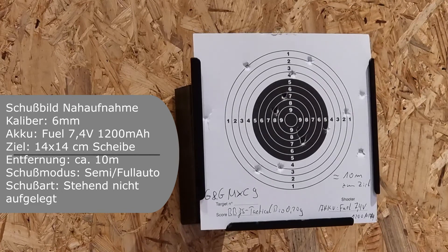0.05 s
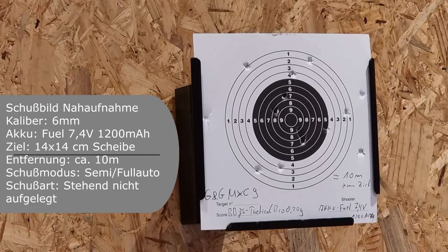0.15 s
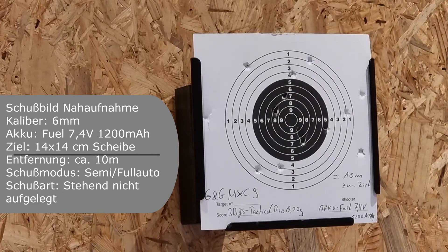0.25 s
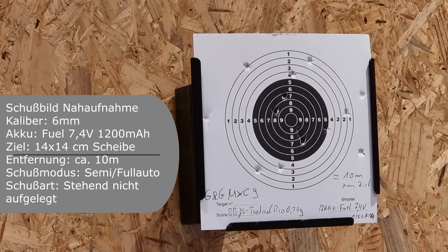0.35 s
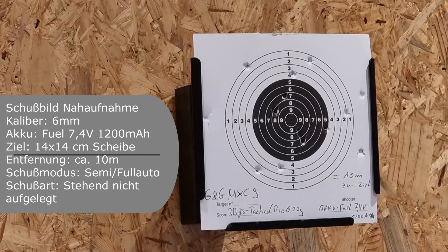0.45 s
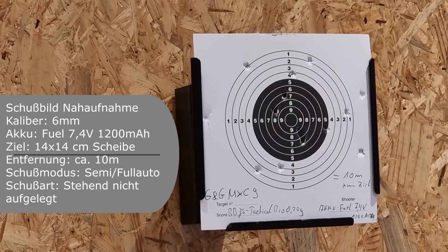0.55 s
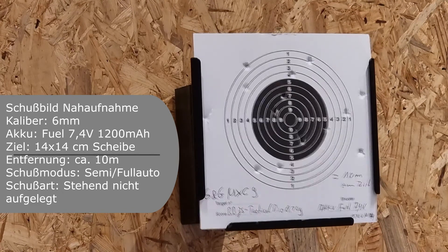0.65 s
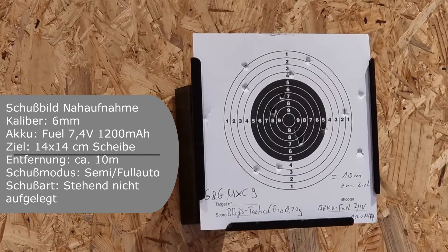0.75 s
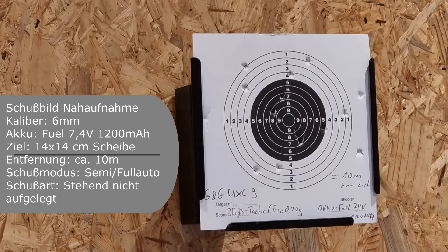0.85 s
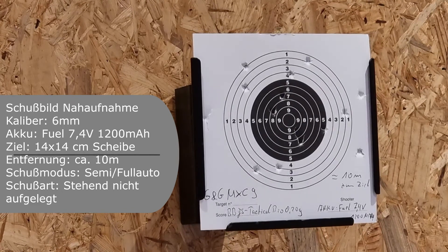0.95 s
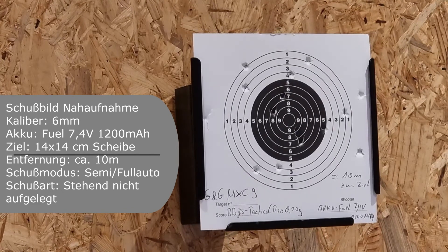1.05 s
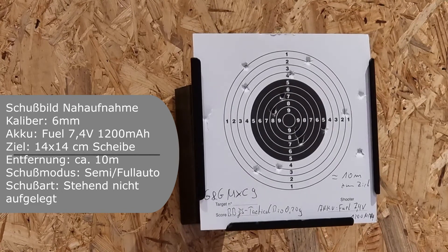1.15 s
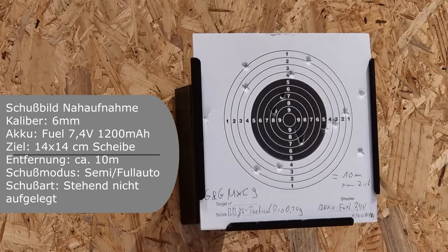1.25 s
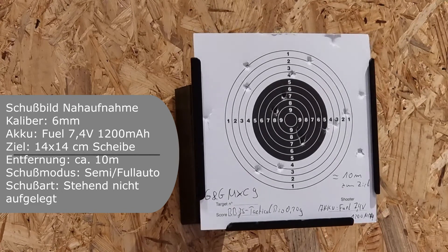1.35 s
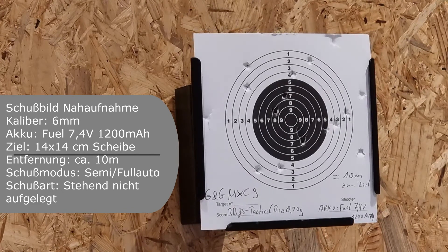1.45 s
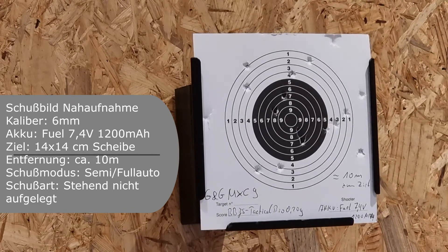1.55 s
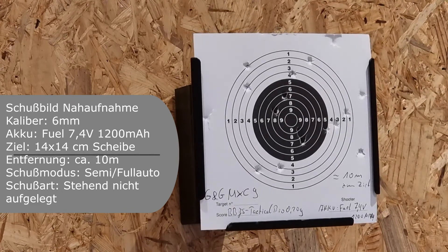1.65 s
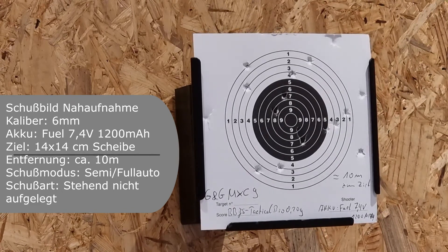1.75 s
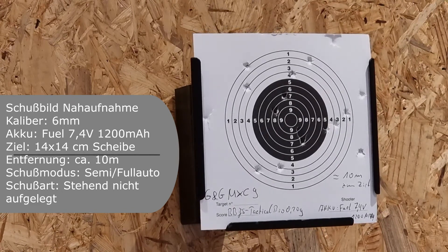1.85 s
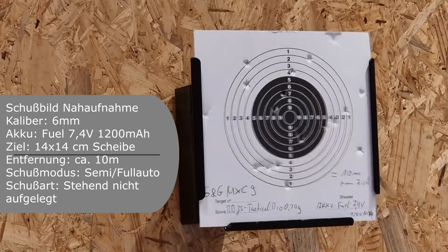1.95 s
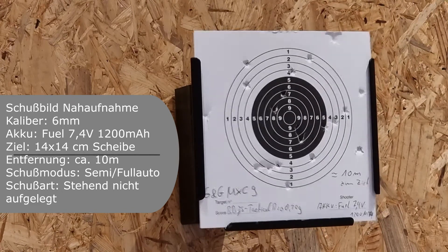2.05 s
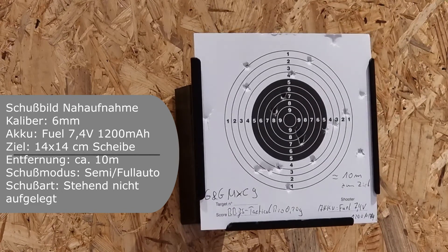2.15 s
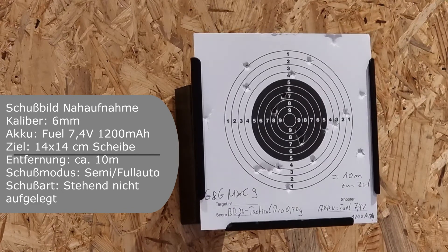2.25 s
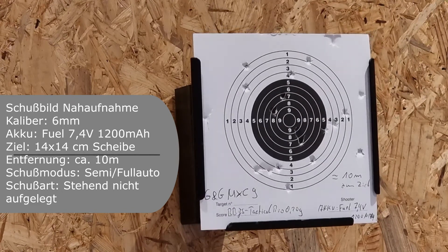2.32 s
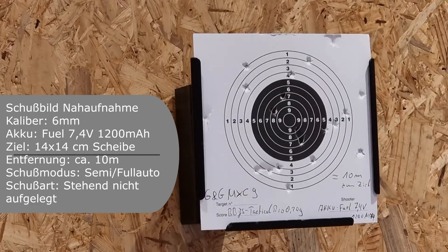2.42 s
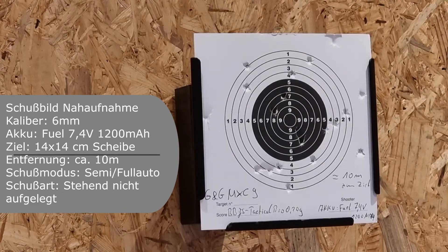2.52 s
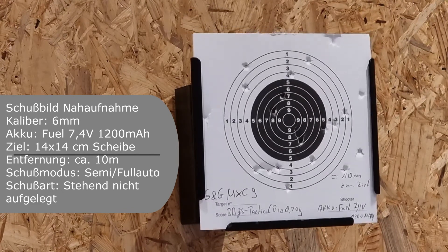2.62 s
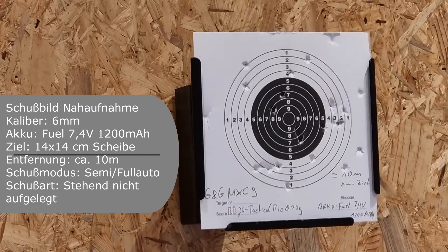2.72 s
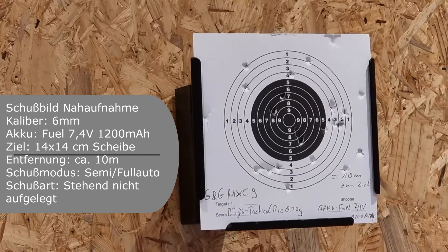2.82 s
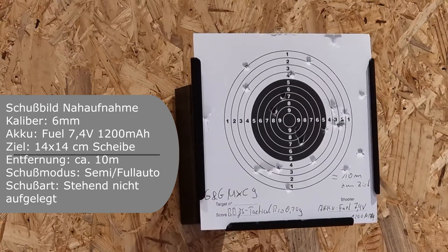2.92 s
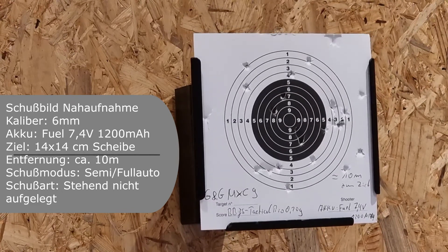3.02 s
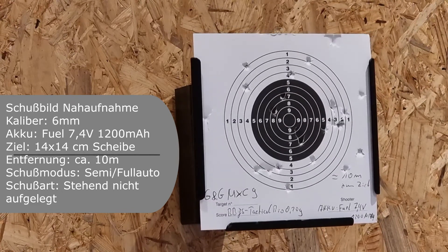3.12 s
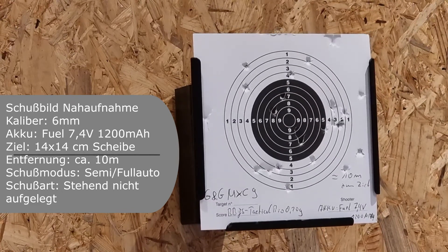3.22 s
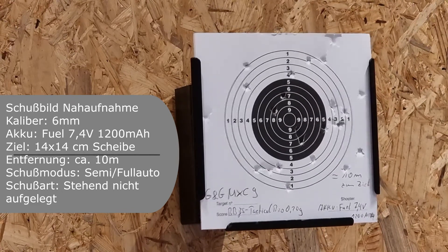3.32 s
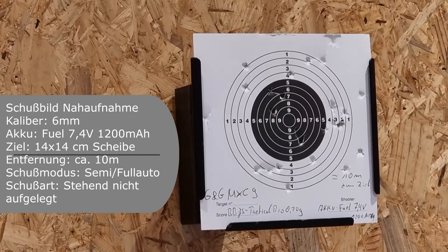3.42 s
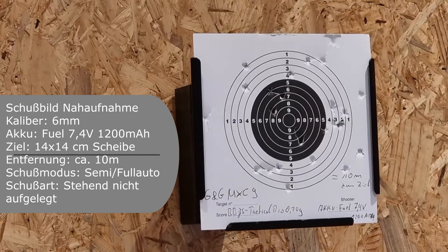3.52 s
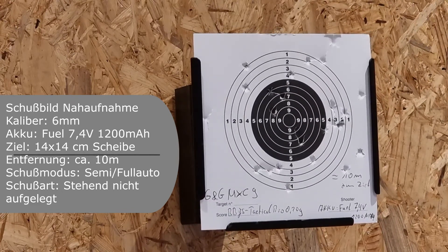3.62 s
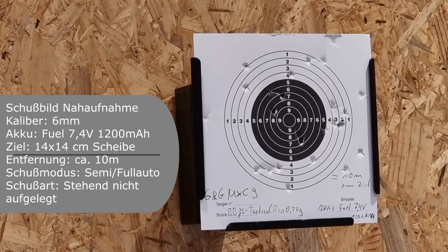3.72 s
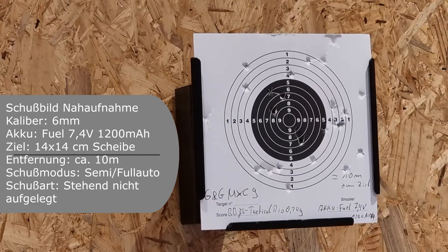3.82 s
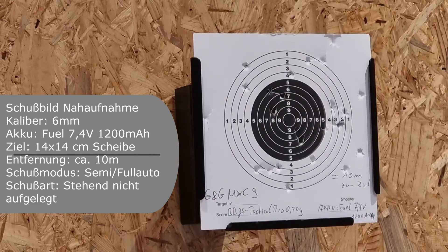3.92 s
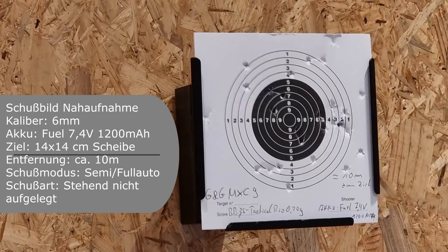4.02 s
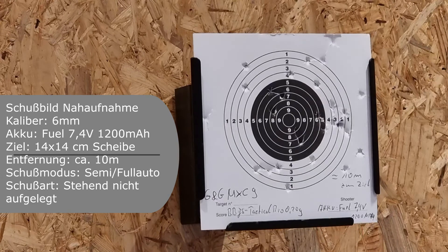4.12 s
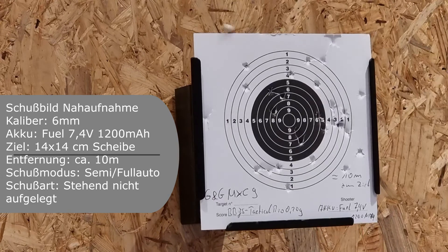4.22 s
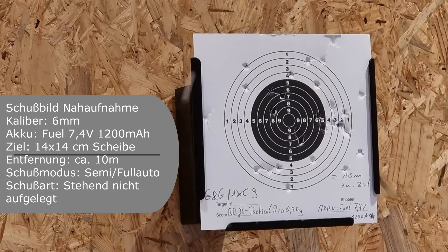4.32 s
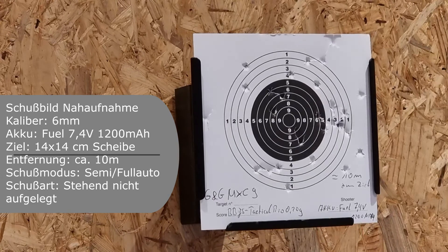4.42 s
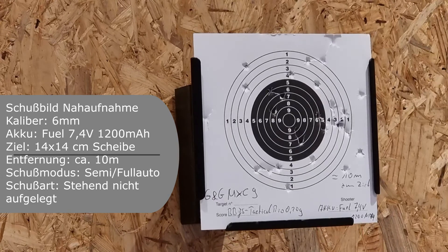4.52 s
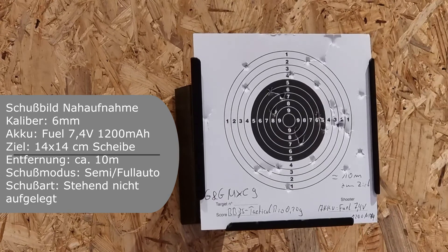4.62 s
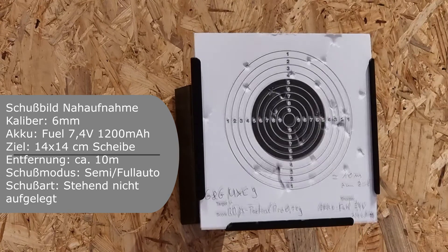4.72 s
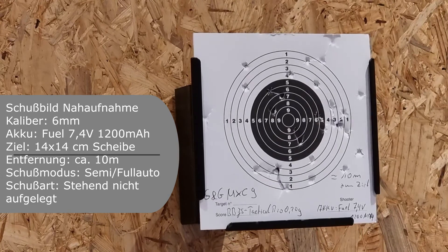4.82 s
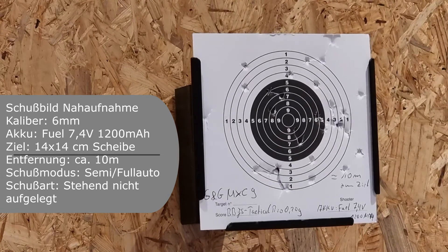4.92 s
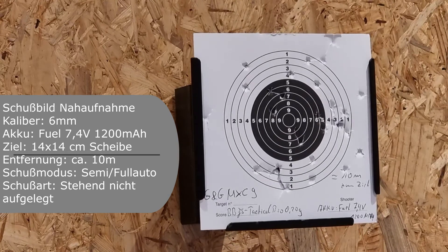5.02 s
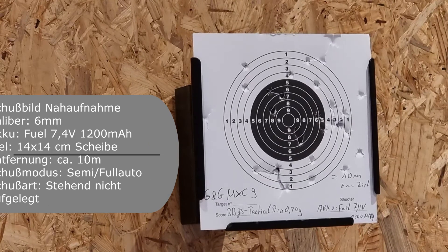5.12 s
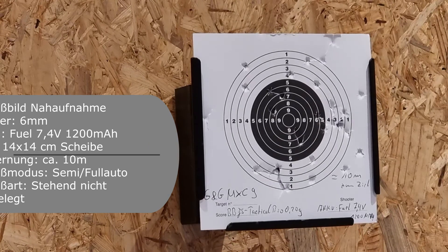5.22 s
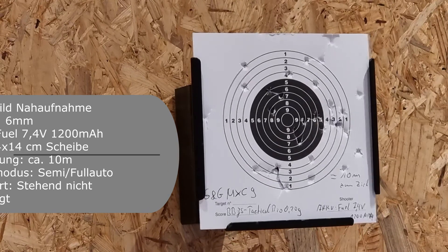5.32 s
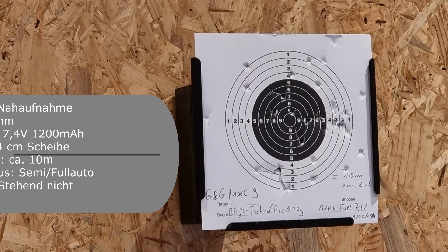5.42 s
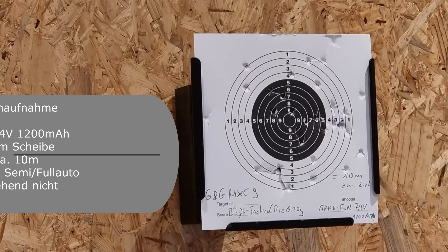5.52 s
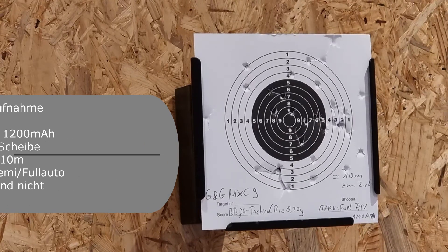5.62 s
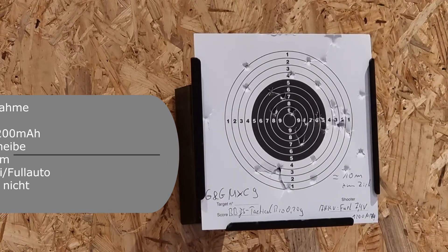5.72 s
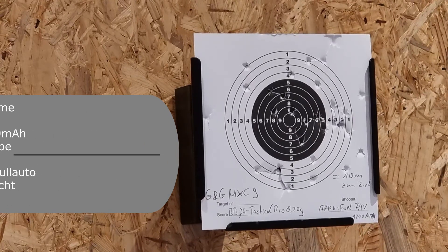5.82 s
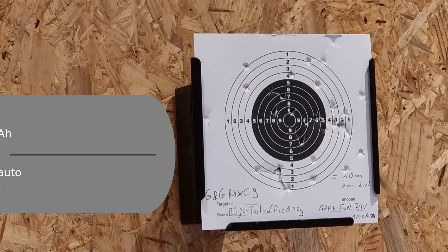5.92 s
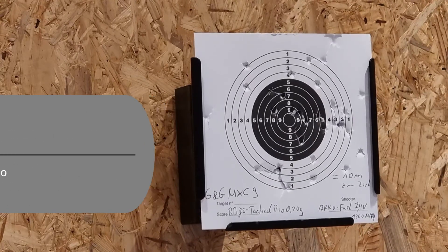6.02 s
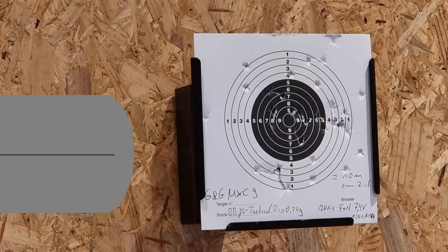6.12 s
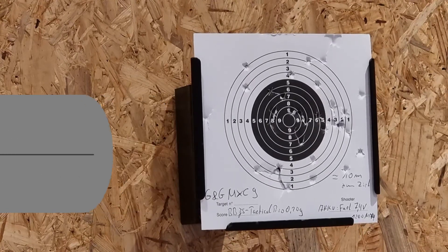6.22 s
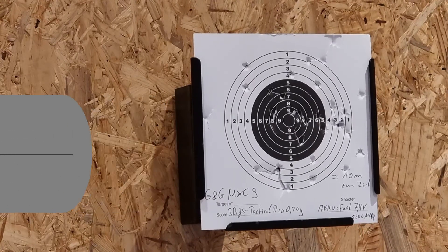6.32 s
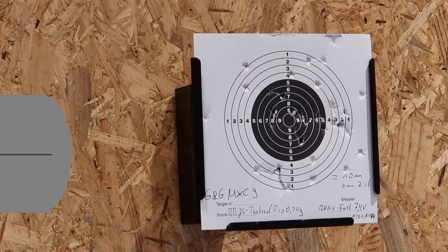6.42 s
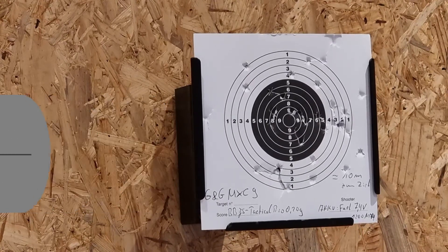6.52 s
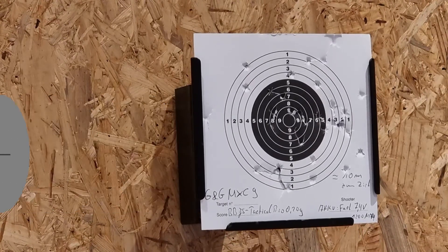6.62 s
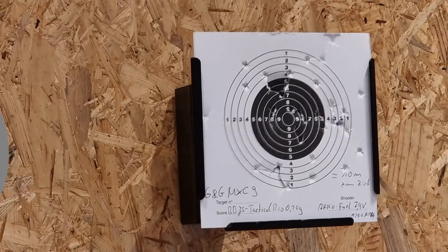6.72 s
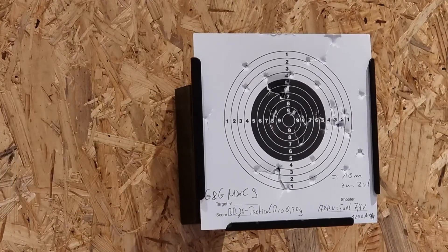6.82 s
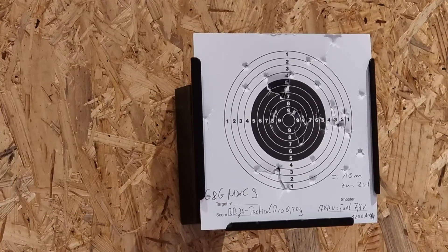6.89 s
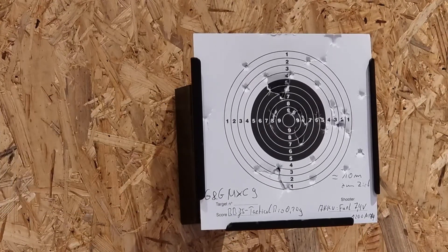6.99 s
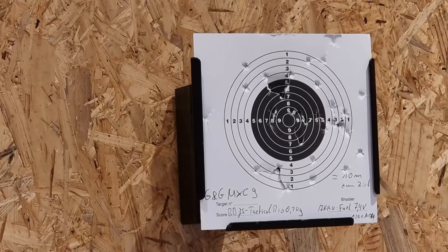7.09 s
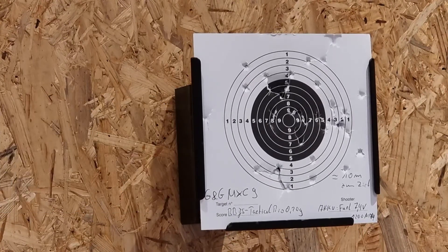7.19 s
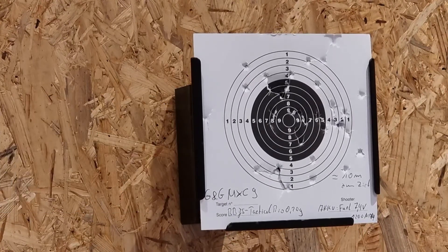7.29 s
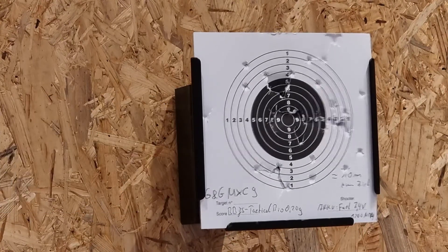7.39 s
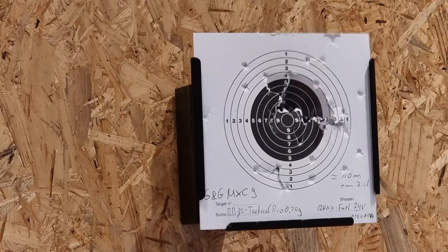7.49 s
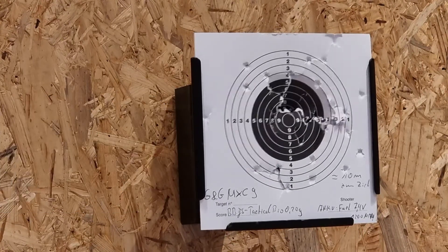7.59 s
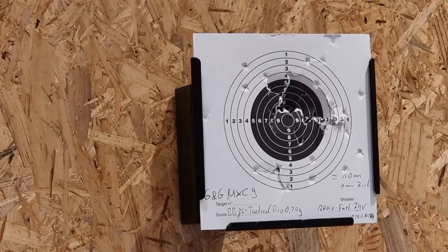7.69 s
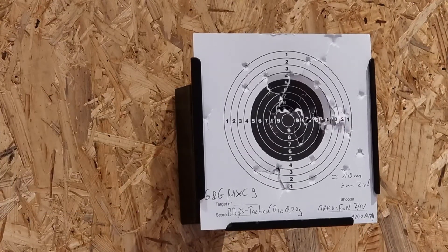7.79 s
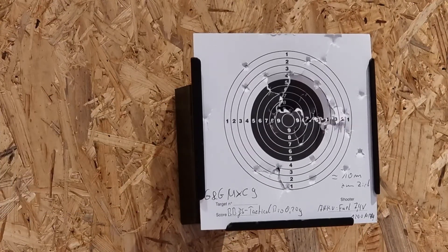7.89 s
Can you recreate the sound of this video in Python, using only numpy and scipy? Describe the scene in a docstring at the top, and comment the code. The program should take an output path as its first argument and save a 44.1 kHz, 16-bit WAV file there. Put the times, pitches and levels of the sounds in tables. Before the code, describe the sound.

Twelve brief bursts of pellets arrive at a steady pace. A dull distant report and gear whirr come just before each, then fast, loud, bright clanks on steel, close to the microphone, with tearing paper hiss. High pings from the rim, a thin lingering ring and scattered ticks fill the gaps. Indoor reverberation is short, with faint room hush and no speech.

```python
"""An airsoft gun at the far end of a room fires twelve short bursts at a paper target on a steel pellet trap.
Each burst starts as a distant whirr and dull reports: noise, partly passed through gearbox resonances.
Pellets then hiss in, crack the back plate (decaying sines), spray through paper and trap (noise), ring the steel.
Spent pellets ping on the rim, tick and rattle (modes, short noise); a limiter holds the hits down."""
import sys
import numpy as np
from scipy import signal
from scipy.io import wavfile
from scipy.ndimage import uniform_filter1d

SR = 44100
rng = np.random.default_rng(int(sys.argv[2]) if len(sys.argv) > 2 else 0)


def store_wav(level_fs):
    """Save 16-bit WAV to argv[1]."""
    pcm = np.round(np.clip(np.atleast_2d(level_fs), -1, 1) * 32767)
    wavfile.write(sys.argv[1], SR, pcm.T.astype(np.int16))


N = 350595
LEAD = SR // 2  # samples kept ahead of time zero for sounds that start before it
AGE_S = np.arange(SR) / SR


def gain_of(db):
    """Decibels to amplitude."""
    return 10 ** (np.asarray(db) / 20)


def decay(t_s, t60_s):
    """Exponential decay, 60 dB down after t60_s."""
    return np.exp(-np.log(1000) * t_s / t60_s)


def swell(rise_s):
    """Reflections build a sound up over rise_s."""
    return 1 - np.exp(-AGE_S / rise_s)


def read(points, hz):
    """A table of (Hz, value), joined on a log-frequency axis."""
    table_hz, value = np.transpose(points)
    return np.interp(np.log(hz + 1), np.log(table_hz + 1), value)


def high_pass(x, hz, order=1):
    """Takes away the bass under hz."""
    return signal.sosfilt(signal.butter(order, hz, "high", fs=SR, output="sos"), x)


def smooth(x, time_s):
    """One-pole average over time_s."""
    keep = np.exp(-1 / (time_s * SR))
    return signal.lfilter([1 - keep], [1, -keep], x)


def empty_mix():
    """Stereo silence that begins LEAD samples early."""
    return np.zeros((2, LEAD + N))


def add(mix, start_s, sound):
    """Lays a stereo sound into a mix that begins LEAD samples early."""
    part = mix[:, max(LEAD + round(start_s * SR), 0):][:, :sound.shape[1]]
    part += sound[:, :part.shape[1]]


# Left-right likeness of the sound field. Each row: frequency in Hz, correlation from -1 to 1.
LIKENESS = [(40, 0.23), (130, 0.87), (300, 0.68), (700, 0.34), (1400, -0.16), (2800, 0.27), (5000, -0.021),
            (16000, -0.18)]
# Stereo balance. Each row: frequency in Hz, left minus right in dB.
BALANCE_DB = [(50, 9), (170, -0.5), (400, -1), (2800, 0.8), (6000, -0.4), (10000, 0.2), (14000, -2)]


def noise(spectrum, t60=None, bright_db=0, ripple_db=0, size=SR):
    """Stereo noise, rms near 1 at the start before bright_db; resonances ripple its colour and decay."""
    hz = np.fft.rfftfreq(512, 1 / SR)
    t_s = np.arange(size // 128 + 5) * 128 / SR
    a, b, c, d = rng.standard_normal((4, len(hz), len(t_s)), dtype=np.float32)
    same = np.clip(read(LIKENESS, hz), -1, 1)[:, None]
    lean = gain_of(read(BALANCE_DB, hz) / 2)[:, None]
    shared, apart = a + 1j * b, c + 1j * d
    bins = np.array([shared * lean, (same * shared + np.sqrt(1 - same ** 2) * apart) / lean])
    ripple = ripple_db * uniform_filter1d(rng.standard_normal(len(hz)), 2) * np.sqrt(2)
    colour = gain_of(read(spectrum, hz) + ripple)
    colour /= np.sqrt(np.sum(colour ** 2))
    # bright_db acts in full above 12 kHz, 0.45 of it below 5.5 kHz
    colour *= gain_of(bright_db * read([(5500, 0.45), (12000, 1.0)], hz))
    bins *= colour[:, None]
    if t60 is not None:
        # strong resonances last longer
        bin_t60_s = read(t60, hz) * gain_of(0.56 * np.minimum(ripple, 2))
        bins *= decay(t_s, bin_t60_s[:, None])
    return np.sqrt(3) * signal.istft(bins, nperseg=512, noverlap=384)[1][:, :size]


def ring(modes, rise_s, scatter_db, detune):
    """Decaying modes; weights vary per blow, and the two microphones meet them in other phases."""
    out = np.zeros((2, SR))
    for hz, db, t60_s in modes:
        weight, drift, apart = rng.standard_normal(3)
        phase = 2 * np.pi * rng.random() + np.array([[0], [apart * (1.5 - read(LIKENESS, hz))]])
        t_s = AGE_S[AGE_S < 2 * t60_s]
        level = gain_of(db + scatter_db * weight) * decay(t_s, t60_s)
        out[:, :len(t_s)] += level * np.sin(2 * np.pi * hz * (1 + detune * drift) * t_s + phase)
    fade_out = np.minimum(4 * (1 - AGE_S), 1)
    return out * swell(rise_s) * fade_out


def clatter(depth_db, grain_s):
    """A random level curve that makes a sound lumpy, one knot every grain_s."""
    knots_s = np.arange(0, 1 + grain_s, grain_s)
    return gain_of(depth_db * np.interp(AGE_S, knots_s, rng.standard_normal(len(knots_s))))


# Spectrum of the quiet room. Each row: frequency in Hz, relative density in dB per Hz.
HUSH_SPECTRUM = [(25, -14), (80, -3), (250, -13), (700, -6.5), (2800, 3), (6000, -2.5), (16000, -13)]


def hush(level_db):
    """The quiet of the room: steady coloured noise."""
    return gain_of(level_db) * noise(HUSH_SPECTRUM, size=N)


# The gun's bursts. Each row: arrival of the first pellet in seconds, number of shots.
BURST_ROWS = [(0.048, 2), (0.727, 2), (1.348, 2), (2.026, 3), (2.7064, 3), (3.4079, 2), (4.073, 3),
              (4.7997, 2), (5.454, 2), (6.1826, 2), (6.8144, 3), (7.5371, 3)]
CYCLE_S = 0.068  # shot to shot
FLIGHT_S = 0.1705  # sound of the gun to the pellet's arrival
# Spectrum of the report. Each row: frequency in Hz, relative density in dB per Hz.
REPORT_SPECTRUM = [(40, -31), (100, -26), (135, -6), (200, -8), (500, -2), (850, -7.5), (1100, 7.5),
                   (2000, 5), (2800, 1.5), (4800, 0), (6000, -19.5), (9000, -10.5), (11500, -9.5),
                   (14000, -2)]
# Spectrum of the whirr's hiss. Each row: frequency in Hz, relative density in dB per Hz.
WHIRR_SPECTRUM = [(100, -47), (800, -10), (1050, -9), (1300, 4), (1460, 13), (1700, -21), (2600, -10),
                  (4800, -7), (6500, -13.5), (16000, -37)]
# Decay of noise in the room. Each row: frequency in Hz, nominal t60 in seconds.
ROOM_DECAY = [(100, 0.93), (700, 0.48), (2500, 0.51), (6000, 0.46), (16000, 0.29)]
# Resonances of gearbox, gun body and room. Each row: frequency in Hz, relative level in dB, t60 in seconds.
GEARBOX_MODES = [(133, -20.5, 0.38), (493, -17, 0.17), (617, -12, .2), (1004, 0, 0.11), (1247, -8, 0.088),
                 (1345, -2, 0.17), (1393, -1, 0.13), (1470, 3, 0.24), (1540, -11, 0.096), (1770, -2, 0.14),
                 (2794, -0.5, 0.087), (4690, 2, 0.051)]


def gun(report_db, whirr_db, gears_db, run_s, coast_s, throb_hz, throb_depth):
    """Far off, mostly room sound: the piston's report, then gears grinding up the next shot as noise in modes."""
    out, teeth = empty_mix(), empty_mix()
    coast = np.exp(-np.maximum(AGE_S - run_s, 0) / coast_s)
    throb = 1 + throb_depth * np.sin(2 * np.pi * throb_hz * AGE_S)
    running = swell(0.0042) * coast * throb
    for first_s, shots in BURST_ROWS:
        for k in range(round(shots)):
            shot_s = first_s - FLIGHT_S + k * CYCLE_S
            bright_db = 2 if k else 0  # brighter after the first shot
            report = noise(REPORT_SPECTRUM, ROOM_DECAY, bright_db, ripple_db=5.0) * swell(0.0017)
            hiss = noise(WHIRR_SPECTRUM, ripple_db=2) * running * clatter(depth_db=0.5, grain_s=0.0025)
            add(out, shot_s, gain_of(report_db) * report + gain_of(whirr_db) * hiss)
            add(teeth, shot_s, running * rng.standard_normal((2, SR)))
    body = ring(GEARBOX_MODES, rise_s=0.00057, scatter_db=2, detune=0)
    body /= np.linalg.norm(body[0])
    gears = signal.oaconvolve(teeth, body, axes=1)[:, :LEAD + N]
    return out + gain_of(gears_db) * gears


def burst_ends():
    """Nominal arrival of the last pellet of each burst, in seconds."""
    return [first_s + (round(shots) - 1) * CYCLE_S for first_s, shots in BURST_ROWS]


# Pellets that reach the plate; where each lands sets its notes. Each row: start in seconds, force in dB,
# thud in dB, then the level in dB of each of the three long notes.
PLATE_HITS = [(0.0474, 0, 12.5, 1.5, -15, -20), (0.1148, 3.5, 8, 1.5, 3.5, -20),
              (0.7971, 3.5, 9, -13, -8.5, -16), (1.35, 3.5, -6, -3, -4, -6), (1.4055, 3, 5.5, -2, 5, -17),
              (2.029, 1.5, 8, 1, 2.5, -12), (2.0973, 3, 12, 9, 1, -12), (2.1635, 2.5, 15, 8, -1, -11),
              (2.7083, 2.5, -4, -6, -3, -4), (2.7764, 3, -4, 4, -10, -4.5), (2.8437, 3, 7, 0, -9, -9),
              (3.4094, 1.5, -2, -26, -6, -15), (3.4767, 1, 2, -26, -8.5, -15.5),
              (4.0736, 2.5, -7, 0.5, 4.5, -1.5), (4.142, 3.5, -3, 4, 4, -13),
              (4.2092, 0.5, 0, -19, -10, -16), (4.7998, 2.5, 8, 0, -1, -16),
              (4.8685, 1.5, 6, 3.5, -0.5, -15), (5.4533, 1, -3, 5.5, -14, -7),
              (5.5228, 3, 4, 2.5, -12, -12.5), (6.1838, 0, 4, -2, -27, -17), (6.252, 3, 15, 5, -27, -16.5),
              (6.8152, 2, 0, -26, 4, -20), (6.8829, 1, 8, -20, -4, -19), (7.5378, 1.5, 1, -8, -15, -22),
              (7.6079, 2.5, 6, -13, -7, -23), (7.6745, 1, 4, -26, -8, -20)]
# Shots that rip the paper without cracking on the plate. Each row: start in seconds, level in dB, brightness in dB.
PAPER_GRAZES = [(0.728, -11, 18), (6.94, 0.5, -5.5)]


def arrivals():
    """Every pellet that reaches the paper: (start s, level dB, brightness dB)."""
    return [(s, force_db, 0) for s, force_db, *_ in PLATE_HITS] + list(PAPER_GRAZES)


# Spectrum of pellet noise. Each row: frequency in Hz, relative density in dB per Hz.
SPRAY_SPECTRUM = [(40, -35), (100, -9.5), (330, -15.5), (650, -3.5), (880, -7), (1500, -5.5), (1900, -3.5),
                  (3000, 1.5), (3600, -1.5), (5200, 2), (7500, 1), (9200, -1), (12500, 4), (16000, 3.5)]


def flight(level_db, approach_s):
    """The hiss of a pellet grows exponentially as it nears the target."""
    out, t_s = empty_mix(), AGE_S[:SR // 10]
    for arrival_s, *_ in arrivals():
        hiss = noise(SPRAY_SPECTRUM, size=len(t_s)) * np.exp(-t_s[::-1] / approach_s)
        add(out, arrival_s - len(t_s) / SR, gain_of(level_db) * hiss)
    return out


# Decay of noise in the trap. Each row: frequency in Hz, nominal t60 in seconds.
TRAP_DECAY = [(100, 0.22), (700, 0.21), (2000, 0.21), (6000, 0.17), (16000, 0.15)]
# The louder ricochets. Each row: start in seconds, relative level in dB, brightness in dB.
STRAY_ROWS = [(0.298, -33, -1.5), (0.362, -37, 9.5), (.485, -35, -0.5), (0.901, -21, -1.5),
              (1.554, -27.5, -9), (1.62, -32.5, -6), (1.718, -44, 13), (1.74, -33.5, 9), (1.768, -20, 11.5),
              (1.925, -23.5, -9), (2.28, -29.5, 4), (2.407, -28, -3.5), (2.472, -34, -3), (3.029, -38.5, 4),
              (3.122, -41.5, 2), (3.636, -21.5, -9), (4.417, -45.5, 8), (4.996, -26, -3), (5.036, -32, -4),
              (5.142, -35, -1.5), (5.201, -29.5, -4.5), (5.825, -27, -32), (5.925, -34, -18),
              (7.167, -24.5, -4), (7.837, -29.5, 2.5), (7.865, -30.5, 1)]
SNAP_DB_PER_DB = -0.3  # dull ticks on wood start more sharply than bright rips in paper


def strays(tick_db, room_db, snap_db):
    """Spent pellets tick against paper, wood and steel: decaying noise with a sharp onset."""
    out = empty_mix()
    for start_s, db, bright_db in STRAY_ROWS:
        near = noise(SPRAY_SPECTRUM, TRAP_DECAY, bright_db, ripple_db=0.5)
        room = noise(SPRAY_SPECTRUM, ROOM_DECAY, bright_db, ripple_db=3.5)
        tick = (gain_of(tick_db) * near + gain_of(room_db) * room) * swell(0.012)
        tick += gain_of(snap_db + SNAP_DB_PER_DB * bright_db) * near * np.exp(-AGE_S / 0.006)
        add(out, start_s, gain_of(db) * high_pass(tick, 210))  # light blows hardly move the trap
    return out


# Weak resonances crowded in the trap's thin side panels. Each row: frequency in Hz, relative level in dB.
PANEL_LEVELS = [(1500, -9.5), (3000, -5), (5500, 1), (9000, -10.5)]
# pellets rattle on in the trap after a burst
RATTLE_PER_S, RATTLE_DB, RATTLE_FADE_DB_PER_S, RATTLE_SCATTER_DB = 45, -12, 85, 3.5


def rattle():
    """Random bounces over one second, fading in level but not in rate."""
    bounces = rng.random(SR) < RATTLE_PER_S / SR
    scatter_db = RATTLE_SCATTER_DB * rng.standard_normal(SR)
    return bounces * gain_of(RATTLE_DB - RATTLE_FADE_DB_PER_S * AGE_S + scatter_db)


def panels(level_db, t60_s, tick_db, modes_per_group=20, groups=4):
    """Hits and later rattle ring groups of weak modes, each group by a random amount; rattle also ticks."""
    out, hits, rattles = np.zeros((2, N)), np.zeros(N), np.zeros(N)
    for start_s, db, _ in arrivals() + list(STRAY_ROWS):
        hits[round(start_s * SR)] = gain_of(db)
    for end_s in burst_ends():
        part = rattles[round(end_s * SR):][:SR]
        part += rattle()[:len(part)]
    low_hz, high_hz = PANEL_LEVELS[0][0], PANEL_LEVELS[-1][0]
    for _ in range(groups):
        mode_hz = low_hz * (high_hz / low_hz) ** rng.random(modes_per_group)
        modes = [(hz, read(PANEL_LEVELS, hz), t60_s) for hz in mode_hz]
        group = ring(modes, rise_s=0.0035, scatter_db=0, detune=0)
        blows = (hits + rattles) * rng.standard_normal(N)
        out += gain_of(level_db) * signal.oaconvolve(blows[None], group, axes=1)[:, :N]
    tick = high_pass(noise(SPRAY_SPECTRUM, TRAP_DECAY, -9), 950) * np.exp(-AGE_S / 0.0094)
    return out + gain_of(tick_db) * signal.oaconvolve(rattles[None], tick, axes=1)[:, :N]


# Bell-like modes of the steel rim. Each row: frequency in Hz, relative level in dB, t60 in seconds.
PING_MODES = [(2746, 2, 0.14), (2741, -14, 0.44), (5140, -20.5, 0.33), (5135, -14, 0.15), (5290, -24, 0.18),
              (10640, -20, 0.19), (10730, -25, .17), (13000, -20, 0.18), (13130, -26, 0.16)]


def ping(overtone_db=0, top_db=0):
    """The rim rings at nearly one pitch wherever touched; its overtones depend on place and blow."""
    colour = [(3000, 0), (5000, overtone_db), (5500, overtone_db), (10000, top_db)]
    modes = [(hz, db + read(colour, hz), t60_s) for hz, db, t60_s in PING_MODES]
    return ring(modes, rise_s=0.012, scatter_db=1.5, detune=0.0015)


# Rebounds that catch the rim. Each row: start in seconds, relative level in dB, overtones near 5 kHz in dB.
RIM_TOUCHES = [(0.134, -6.5, -7), (0.361, -16.5, 3), (0.439, -27, 4), (0.486, -22.5, 4), (0.804, -5.5, 9),
               (1.358, -4, 10), (2.109, 3, -7), (2.236, -34, 0), (2.377, -25, 4), (2.474, -17.5, -2),
               (2.722, -9, 10), (2.785, 3, 0), (2.856, -4.5, -7), (3.491, -3.5, -6), (3.593, -31, 1),
               (3.82, -33, 0), (4.085, -8.5, 9), (4.154, 1.5, -7), (4.29, -25, 0), (4.387, -28.5, 6),
               (4.454, -35, 4), (4.522, -28, -14), (5.468, 0, 1), (5.533, 2.5, -3), (5.648, -19, -1),
               (5.766, -30, 2), (6.263, -4, 7.5), (6.392, -32, 12), (6.827, -4, 10.5), (6.902, -6, 0),
               (7.054, -25.5, 2), (7.132, -20, -2), (7.632, -1, -3)]
PING_TOP_DB, PING_TOP_DB_PER_DB = -11, -0.25  # a light touch is short, so brighter than a square blow


def rim(level_db):
    """Rebounding pellets strike the steel rim; the lighter the touch, the brighter its ping."""
    out = empty_mix()
    for start_s, db, overtone_db in RIM_TOUCHES:
        top_db = PING_TOP_DB + PING_TOP_DB_PER_DB * db
        add(out, start_s, gain_of(level_db + db) * ping(overtone_db, top_db))
    return out


# The three long notes of the steel trap. Each row: frequency in Hz, t60 in seconds.
LONG_NOTES = [(1017, 0.29), (1116, 0.41), (2369.5, 1.29)]


def notes(level_db, rise_s, waver):
    """Every plate hit feeds energy to the long notes, by where it lands; the energy leaks away."""
    out, t_s = np.zeros((2, N)), np.arange(N) / SR
    hit_samples = np.round(np.array([row[0] for row in PLATE_HITS]) * SR).astype(int)
    notes_db = np.array([row[3:] for row in PLATE_HITS]).T
    for (hz, t60_s), blow_db in zip(LONG_NOTES, notes_db):
        blows = np.bincount(hit_samples, gain_of(level_db + blow_db) ** 2, N)
        energy = signal.lfilter([1], [1, -decay(2 / SR, t60_s)], blows)
        size = np.sqrt(smooth(energy, rise_s))
        # room reflections make each note waver in level and phase
        knots_s = np.arange(0, t_s[-1] + 1, 0.04)
        draws = rng.standard_normal((2, 2, len(knots_s)))
        echoes = np.array([np.interp(t_s, knots_s, a + 1j * b) for a, b in draws])
        direct = np.exp([[0], [0.9j]])  # right side 0.9 rad ahead
        out += size * ((direct + waver * echoes) * np.exp(2j * np.pi * hz * t_s)).real
    return out


# First flex of the struck trap. Each row: lowest frequency in Hz, relative level in dB, t60 in seconds.
KNOCK_MODES = [(753, -22, 0.3), (880, 5, 0.0018), (1070, -2, 0.044), (1372, -1.5, 0.04), (1823, 1.5, 0.072),
               (2330, 0, 0.023), (3010, 3, 0.023), (5500, 14, 0.0021)]
WALL_ECHO_S, WALL_ECHO_GAIN = 0.001293, 0.47  # the trap's wall throws the crack back


def crack():
    """The plate is shoved back and flexes: a steep pulse, in step at both microphones, and its wall echo."""
    t_s = AGE_S[:SR // 10]
    flex = np.zeros(len(t_s))
    for hz, db, t60_s in KNOCK_MODES:
        struck_hz = hz * rng.uniform(1.0, 1.05)
        flex += gain_of(db) * decay(t_s, t60_s) * np.sin(2 * np.pi * struck_hz * t_s)
    onset = flex * np.exp(-t_s / 0.0016)
    flex = flex + WALL_ECHO_GAIN * np.interp(t_s - WALL_ECHO_S, t_s, onset, left=0)
    return -flex * gain_of([[1], [-1.5]])  # left, right


# Spectrum of the low thud. Each row: frequency in Hz, relative density in dB per Hz.
THUD_SPECTRUM = [(25, -2), (65, 2), (150, -14), (300, 3), (700, -1), (3000, -55)]
# Short modes of back plate and walls. Each row: nominal frequency in Hz, relative level in dB, t60 in seconds.
PLATE_MODES = [(650, -5, 0.2), (741, -10, 0.33), (1817, -3.5, 0.18), (2000, -4, 0.24), (2810, -17, 0.26),
               (3003, -1.5, 0.3), (3015, -4.5, 0.15), (4105, 2, 0.17), (4260, -13, 0.17), (4490, -7, 0.25),
               (4790, -7, .24), (5240, 3.5, 0.1), (5650, -4, .21), (6640, 2.5, 0.18), (6760, 0, 0.17),
               (7840, 5.5, 0.13), (8900, -1, 0.18)]


def pellets(spray_db, room_db, crack_db, thud_db, plate_db):
    """Pellets spray noise through paper and trap; all but the grazing ones crack, thud and ring the plate."""
    out = empty_mix()
    for start_s, size_db, bright_db in arrivals():
        spray = noise(SPRAY_SPECTRUM, TRAP_DECAY, bright_db, ripple_db=3) * swell(0.02)
        spray *= clatter(depth_db=1.7, grain_s=0.003)  # rebounds inside the trap
        room = noise(SPRAY_SPECTRUM, ROOM_DECAY, bright_db) * swell(0.0037)
        add(out, start_s, gain_of(size_db) * (gain_of(spray_db) * spray + gain_of(room_db) * room))
    for start_s, force_db, low_db, *_ in PLATE_HITS:
        thud = noise(THUD_SPECTRUM, TRAP_DECAY) * swell(0.0046)
        plate = ring(PLATE_MODES, rise_s=0.017, scatter_db=3, detune=0.00292)
        add(out, start_s, gain_of(crack_db + force_db) * high_pass(crack(), 590))
        add(out, start_s, gain_of(thud_db + low_db) * thud)
        add(out, start_s, gain_of(plate_db) * plate)
    return out


def scene():
    """The quiet of the room, gun, pellets and ringing steel."""
    mix = gun(report_db=-30.0, whirr_db=-39, gears_db=-37, run_s=0.067, coast_s=0.051,
              throb_hz=29.0, throb_depth=0.1)
    mix += flight(level_db=-15.5, approach_s=0.0063)
    mix += strays(tick_db=7.5, room_db=1.0, snap_db=2.5)
    mix += rim(level_db=2.5)
    mix += pellets(spray_db=4.5, room_db=-21, crack_db=-15, thud_db=-31.5, plate_db=-13.0)
    steel = panels(level_db=-38.5, t60_s=0.4, tick_db=-4.5)
    steel += notes(level_db=-20.0, rise_s=0.018, waver=0.43)
    return hush(level_db=-53) + mix[:, LEAD:] + steel


def record(dry, limit_db=-12, squeeze=0.53, recover_db_per_s=130, edge_hz=16060):
    """A limiter ducks just after each crack and recovers; peaks that slip through clip; then the band limit."""
    power_db = 10 * np.log10(smooth((dry ** 2).mean(0), 0.00048) + 1e-12)
    # hold each peak of the excess, falling at a steady rate before squeeze scales it
    fall_db = np.arange(N) * recover_db_per_s / SR
    over_db = np.maximum.accumulate(np.maximum(power_db - limit_db, 0) + fall_db) - fall_db
    limited = high_pass(dry, 59, order=2) / gain_of(squeeze * over_db)
    clipped = np.clip(limited, -1, 1)
    low_pass = signal.firwin(511, edge_hz, window=("kaiser", 8), fs=SR)
    return signal.oaconvolve(clipped, low_pass[None], "same")


dry = scene()
out = record(dry)
store_wav(out)
```